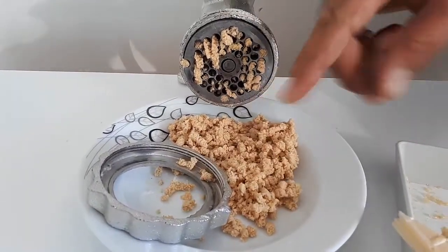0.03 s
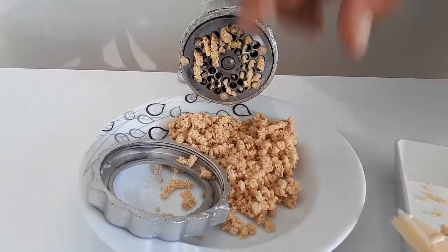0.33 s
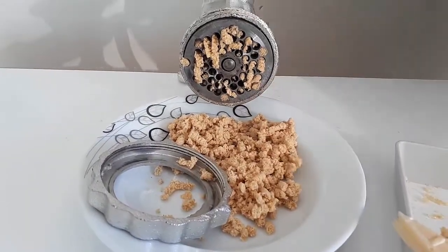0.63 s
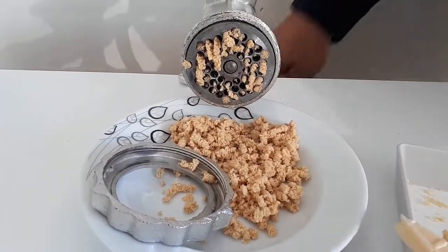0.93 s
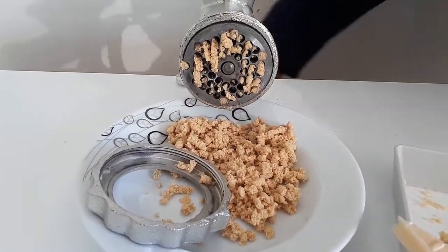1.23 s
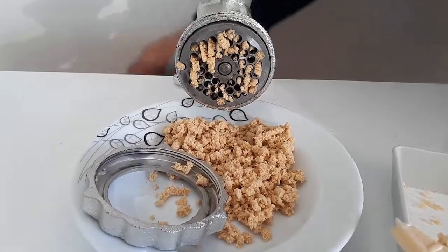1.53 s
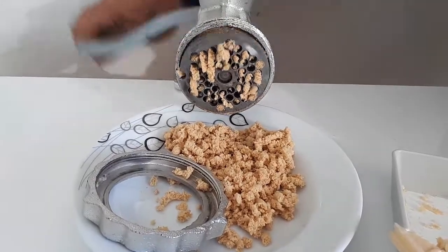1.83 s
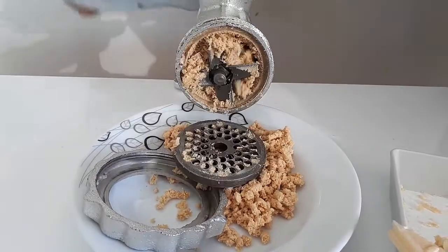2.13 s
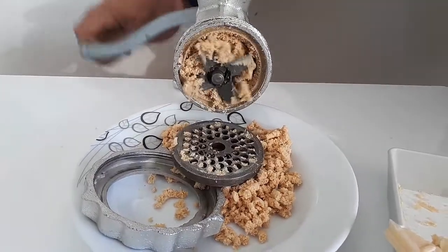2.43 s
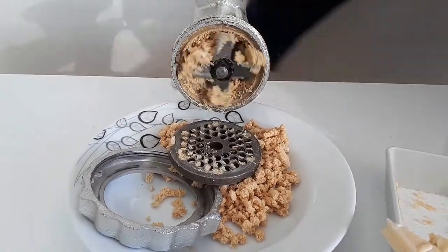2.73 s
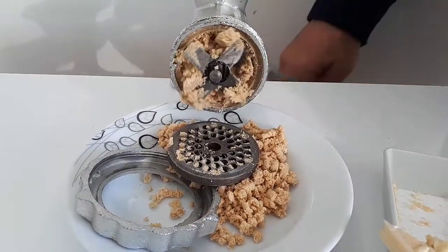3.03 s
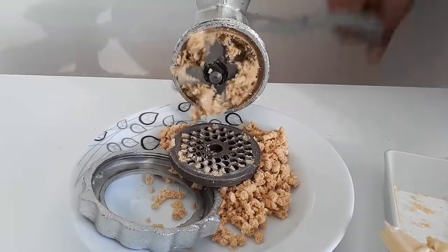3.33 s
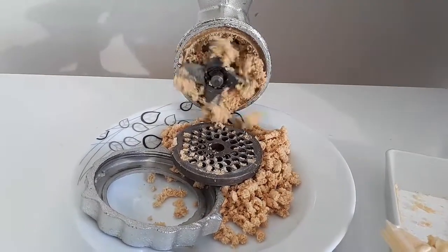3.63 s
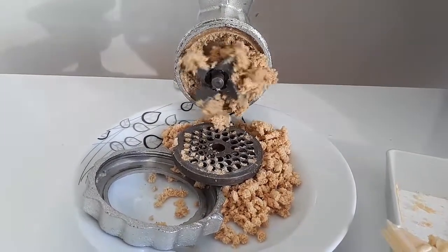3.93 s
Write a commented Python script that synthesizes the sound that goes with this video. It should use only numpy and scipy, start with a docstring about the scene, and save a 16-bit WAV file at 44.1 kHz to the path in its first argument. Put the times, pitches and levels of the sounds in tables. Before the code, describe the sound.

A hand-cranked metal grinder starts softly at about 1 second, after a faint room hum, grinding and knocking in uneven strokes over a dull table rumble. At about 2.1 seconds its steel disc lands on a plate with one loud, briefly ringing clank. The strokes continue with faint wet crackles and a small pop of dough near 2.9 seconds, then knock louder and faster from 3.4 to 4 seconds.

```python
"""First come two faint hisses over the low hum of a small room. Then a hand-cranked metal grinder
pushes crumbly dough onto a plate. Its auger (the screw inside) grinds in strokes and knocks in its
housing, the crank rubs and squeaks, the table rumbles, and the dough crackles wetly and pops.
About two seconds in, the perforated steel disc falls off and lands on the plate with one ringing
clank. The grinding goes on and grows louder."""
import sys
import numpy as np
from scipy import signal
from scipy.fft import rfft, irfft
from scipy.io import wavfile
from scipy.ndimage import uniform_filter1d

SR = 44100
rng = np.random.default_rng(int(sys.argv[2]) if len(sys.argv) > 2 else 0)


def master(y):
    """Save y as 16-bit WAV."""
    cut = np.clip(np.atleast_2d(y).T, -1, 1)
    pcm = np.round(cut * 32767)  # scale
    wavfile.write(sys.argv[1], SR, pcm.astype(np.int16))


N = 176400
T = np.arange(N) / SR
FFT_SIZE = 2 ** 18
HZ = np.maximum(np.arange(FFT_SIZE // 2 + 1) * SR / FFT_SIZE, 1)

# how long the room echoes (t60 is the time to fade by 60 dB): f/Hz, t60/s
ROOM_DECAY = [(100, 0.5), (400, 0.8122), (1000, 0.4933), (2500, 0.5651), (5000, 0.5), (8000, 0.5),
              (15000, 0.0053)]
# how alike left and right are: f/Hz, likeness (0 to 1)
STEREO_LIKENESS = [(60, 1), (150, 0.969), (380, 0.747), (950, 0), (2400, 0), (15000, 0)]
# tone colour of the room's hum: f/Hz, level/dB
HUM_COLOUR = [(25, -21), (50, -15), (85, -13), (125, -5.5), (155, 0), (190, -20), (260, -20.5),
              (500, -23.5), (1000, -24.5), (2000, -29.5), (5000, -33.5), (8000, -32.5), (12000, -34),
              (15500, -37.5)]
# brief, fine hisses: t/s, level/dB, half-length/s
HISS_EVENTS = [(0.195, -60.5, 0.0287), (0.273, -65.5, 0.0257), (2.509, -57.5, 0.051), (3.68, -50, 0.0177)]
# colour of the hisses: f/Hz, level/dB
HISS_COLOUR = [(3000, -10.5), (8000, -11.5), (11500, -5.5), (15000, -2.5)]

# loudness of the table's rumble: t/s, level/dB
RUMBLE_CURVE = [(0, -68), (1.02, -80), (1.065, -49), (1.25, -57.5), (1.65, -54.5), (1.87, -52.5),
                (1.94, -41), (2.01, -38), (2.08, -34.5), (2.25, -48.5), (2.44, -44), (2.52, -34),
                (2.7, -44.5), (3.02, -49), (3.14, -43.5), (3.28, -48.5), (3.42, -42), (3.5, -36.5),
                (3.69, -34.5), (3.79, -39), (4, -34)]
# colour of the rumble: f/Hz, level/dB
RUMBLE_COLOUR = [(25, -29.5), (40, -23), (55, -13.5), (68, -17.5), (85, -7), (115, 1), (165, 0),
                 (215, -4.5), (280, -13.5), (400, -22), (700, -29.5), (1500, -36.5), (4000, -52)]
# resonances of the table, the pitches it favours: f/Hz, width/Hz, lift/dB
TABLE_PEAKS = [(55.3, 12, 4.5), (86.5, 9.6, 7), (110, 12, 3), (145.2, 5.3, 3.5), (237.1, 16, 8),
               (347, 23, 3.5)]
# dull bumps of the crank and clamp: t/s, level/dB, f/Hz, t60/s
CRANK_BUMPS = [(1.696, -40.5, 127.2, 0.22), (1.925, -27.5, 224, 0.144), (1.974, -33, 616.4, 0.044),
               (2.055, -29, 85.13, 0.227), (2.496, -26.5, 231, 0.17), (2.89, -30, 201.1, 0.08),
               (2.949, -33, 163, 0.043), (3.108, -25.5, 212.2, 0.086), (3.667, -25.5, 108.1, 0.09),
               (3.833, -23, 492.6, 0.0475)]
# loudness of the crank's rubbing: t/s, level/dB
RUB_CURVE = [(1.1, -80), (1.68, -75), (1.71, -59), (1.78, -56.5), (1.84, -63.5), (1.9, -53.5),
             (1.925, -48.5), (1.98, -47.5), (2.04, -49.5), (2.4, -58), (2.84, -68.5), (2.865, -40.5),
             (2.91, -46.5), (2.98, -58), (3.09, -66.5), (3.115, -50), (3.16, -66.5), (3.42, -57.5)]
# colour of the rubbing: f/Hz, level/dB
RUB_COLOUR = [(120, -19), (250, 6.5), (400, -0.5), (600, -5), (750, -9), (1200, -22), (2600, -28),
              (6000, -47.5)]
# squeaks of metal on metal: t/s, level/dB, f/Hz, half-length/s
CRANK_SQUEAKS = [(1.87, -74, 7460, .022), (1.925, -59.5, 7490, 0.0142), (2.847, -79.5, 7900, 0.029),
                 (2.95, -78, 7777, 0.0237), (3.33, -76, 7600, .03), (3.68, -69, 7690, 0.016)]

# swells of wet crackle in the dough: t/s, level/dB, rise/s, fall/s
DOUGH_SWELLS = [(1.928, -66.5, 0.0045, 0.0214), (2.051, -53.5, 0.0059, 0.0047), (2.51, -67, 0.02, 0.023),
                (2.852, -64.5, 0.0024, 0.0086), (3.094, -58, 0.00081, 0.003), (3.129, -66.5, 0.0138, 0.05),
                (3.496, -57.5, 0.00378, 0.0054), (3.57, -64, 0.14, 0.058), (3.674, -40.5, 0.00286, 0.0043),
                (3.9, -87.5, .08, .1)]
# colour of the crackle: f/Hz, level/dB
CRACKLE_COLOUR = [(1500, -2), (3000, 3.5), (5000, -1), (7500, 0.5), (10000, -12.5), (13000, -5),
                  (16000, -5)]
# popping air pockets: t/s, level/dB, first f/Hz, last f/Hz, t60/s
AIR_POPS = [(2.851, -22.5, 244.3, 693, 0.03195), (3.107, -32, 300, 473, 0.0407)]

# strokes of the auger, one list each: t/s, grinding level/dB, scraping level/dB
AUGER_STROKES = [
    [(1.024, -76, -96), (1.044, -58, -68.5), (1.06, -51.5, -54.5), (1.08, -51.5, -61), (1.125, -73, -64.5),
     (1.18, -77.5, -72.5)],
    [(1.9, -66.5, -78.5), (1.93, -54.5, -56), (1.96, -67.5, -79), (1.98, -53.5, -59), (2.015, -79, -90.5),
     (2.053, -40, -50), (2.078, -52.5, -59)],
    [(2.3, -56.5, -84), (2.32, -49, -70.5), (2.35, -52.5, -81.5)],
    [(2.44, -58, -80), (2.478, -46, -72), (2.503, -35, -63), (2.565, -39, -57.5), (2.605, -50, -72.5),
     (2.68, -78, -71.5), (2.82, -56, -83.5)],
    [(3.22, -81, -95), (3.33, -81, -87), (3.425, -59, -84), (3.448, -32.5, -66), (3.52, -37, -58),
     (3.62, -41, -56.5), (3.69, -43.5, -53), (3.75, -46.5, -60.5), (3.808, -39.5, -59), (3.828, -36.5, -51),
     (3.89, -40.5, -48), (3.945, -44, -62), (4.0, -35.5, -55.5)],
]
# knocks of the auger in its housing: t/s, knock level/dB, bright click level/dB
AUGER_KNOCKS = [(1.043, -40, -71), (1.0553, -31.5, -57.5), (1.0609, -33, -63.5), (1.087, -43.5, -65),
                (1.926, -37, -57), (2.319, -39, -75), (2.4857, -28.5, -63.5), (2.506, -26.5, -53.5),
                (2.565, -27, -59), (2.781, -42, -74), (3.092, -50, -60), (3.443, -26.5, -60),
                (3.4531, -16, -43), (3.4945, -14.5, -42), (3.498, -20.5, -57.5), (3.563, -20.5, -46),
                (3.593, -27, -54), (3.606, -22, -46.5), (3.626, -26.5, -50), (3.6436, -12.5, -32.5),
                (3.6746, -20.5, -40.5), (3.69, -22, -49), (3.782, -32, -62.5), (3.82, -22, -36.5),
                (3.823, -22.5, -50), (3.835, -27, -39.5), (3.8855, -14.5, -30), (3.891, -19, -52),
                (3.912, -36, -51), (3.960, -19, -50), (3.963, -24, -55)]
# colour of the housing: f/Hz, level/dB
HOUSING_COLOUR = [(60, -18), (130, 1), (230, 3.5), (285, 3.5), (350, 6), (480, 4), (620, 0), (1000, -2),
                  (1450, -5), (1800, -12), (2250, -26), (2800, -23.5), (4000, -44.5), (8000, -43),
                  (15000, -51)]
# resonances of the housing: f/Hz, width/Hz, lift/dB
HOUSING_PEAKS = [(336.4, 52, 4.5), (479, 45, 3.5), (748.4, 57, 8.5), (860.9, 29, 8), (913, 22, 5.5),
                 (1120, 65, 10), (1315, 55, 10), (1440.5, 45, 7), (1732.3, 22, 4), (1996.5, 50, 13),
                 (2596, 81, 12.5), (2817.5, 46, 7.5), (4885, 350, 16.5)]
# extra colour of the first stroke, with the disc still in place: f/Hz, lift/dB
DISC_ON_COLOUR = [(60, -4.5), (200, -1), (350, 4.5), (450, -11), (650, -3.5), (850, -1.5), (1100, -4),
                  (1700, 6.5), (2600, 7), (5000, 3)]
# colour of the bright scraping: f/Hz, level/dB
SCRAPE_COLOUR = [(700, -22.5), (1800, 7), (2700, 4.5), (3800, -4), (6000, -15), (7500, -16.5),
                 (10000, -19.5), (15000, -28)]

# contacts of the landing disc: t/s, level/dB
DISC_CONTACTS = [(2.0815, -1), (2.0842, -11), (2.096, -17.5)]
# ringing tones of the disc, in close groups that beat: f/Hz, level/dB, t60/s, left minus right/dB
DISC_TONES = [(2286, -11, 0.059, -5.5), (2293, -28, .44, -2), (2253, -28, 0.28, 5), (2312, -39, .45, 0),
              (2132, -41, .4, 0), (2440, -40, .28, 0), (3550, -11.5, .06, 1.5), (3538, -28, 0.28, 0),
              (3601, -40, .33, -4), (3564, -40, .4, 0), (3500, -35, .22, 0), (4963, -25, 0.11, -7.5),
              (4985, -42, .12, 0), (4957, -48, .58, -2), (6422, -39, 0.26, -6), (4967.6, -48.5, .58, -2),
              (7530, -38, .1, -5), (8200, -45, .12, 4.5), (7965, -42, .1, 9), (8865, -46, 0.11, -9.5),
              (9400, -49, .09, -8), (10260, -48, 0.13, -7), (11340, -47, .13, -1), (12600, -51, 0.12, -6.5),
              (13320, -50, 0.1, 3)]
# ringing tones of the loaded plate: f/Hz, level/dB, t60/s, left minus right/dB
PLATE_TONES = [(455.7, -29.5, 0.326, 0.5), (910.5, -36.5, 0.29, -1.5), (1062.3, -43, 0.59, -1),
               (1088.3, -35.5, 0.13, -5), (1274, -29.5, 0.08, -5.5), (1593.4, -34.5, .1, -13)]
# colour of the sharp crack as the disc hits the plate: f/Hz, level/dB
CRACK_COLOUR = [(100, -17), (450, -6.5), (700, 4), (1050, 6), (1600, 1), (2800, -4.5), (3800, -5),
                (5000, -16), (5800, -14.5), (8000, -17), (10000, -20), (13000, -15.5), (16000, -30.5)]


def from_db(db):
    """Turn decibels into a number to multiply by."""
    return 10 ** (np.asarray(db) / 20)


def unit_rms(x):
    """Scale a signal so that its average strength (rms) is 1."""
    return x / np.sqrt(np.mean(x ** 2) + 1e-20)


def unit_energy(x):
    """Scale a signal so that its squares add up to 1."""
    return x / np.linalg.norm(x)


def at_hz(points, hz=HZ):
    """Read between the rows of a table, with octaves evenly spaced."""
    freqs, values = np.transpose(points)
    return np.interp(np.log(hz), np.log(freqs), values)


def lifts(resonances):
    """The boost in dB that resonances give at each frequency."""
    return sum(db / (1 + (2 * (HZ - hz) / width) ** 2) for hz, width, db in resonances)


def level(rows, column=1):
    """Gain along a loudness curve, silent outside it."""
    rows = np.array(rows)
    return from_db(np.interp(T, rows[:, 0], rows[:, column], left=-200, right=-200))


def response(db):
    """How an object with this colour answers one click, scaled to a peak of 1."""
    cepstrum = irfft(np.log(from_db(db)))
    # folding onto the first half makes the sound come after the click, never before
    cepstrum[1:FFT_SIZE // 2] *= 2
    cepstrum[FFT_SIZE // 2 + 1:] = 0
    answer = irfft(np.exp(rfft(cepstrum)))[:SR // 2]
    return answer / np.abs(answer).max()


def through(x, answer):
    """Pass a sound through an object, given its answer to one click."""
    return signal.fftconvolve(np.atleast_2d(x), np.atleast_2d(answer), axes=-1)[:, :N]


def keep_band(x, side, hz, order):
    """Keep the "low" or "high" side of a frequency; a higher order cuts more steeply."""
    return signal.sosfilt(signal.butter(order, hz, side, fs=SR, output="sos"), x)


def pan(db):
    """Left and right gains, the left one louder by db."""
    return from_db(np.array([[db], [-db]]) / 2)


def clicks(rows):
    """One click for each pair of time and level."""
    out = np.zeros(N)
    for start, db in rows:
        out[int(start * SR)] += from_db(db)
    return out


def grains(per_s, spread_db):
    """Random clicks of uneven size."""
    sizes = from_db(spread_db * np.minimum(rng.exponential(1, N), 4)) * rng.choice([-1, 1], N)
    return sizes * (rng.random(N) < per_s / SR)


def wobble(samples, shape=N):
    """A random wander: noise averaged over this many samples."""
    return unit_rms(uniform_filter1d(rng.standard_normal(shape), size=samples))


def stereo_noise(db):
    """Noise with this colour, alike in both ears only in the bass."""
    mid, side = rfft(rng.standard_normal((2, FFT_SIZE)))
    alike = np.clip(at_hz(STEREO_LIKENESS), -.99, .99)
    spectrum = np.sqrt(1 + alike) * mid + np.sqrt(1 - alike) * side * [[1], [-1]]
    return unit_rms(irfft(from_db(db) * spectrum)[:, :N])


def room_echo():
    """The walls answer a click with a wash of echoes that dies fastest in the high treble."""
    t, build_s = T[:SR], 0.0022
    octaves = np.log2(np.maximum(np.arange(SR // 2 + 1), 1))
    noise = rfft(stereo_noise(0 * HZ)[:, :SR])
    echo = 0
    for octave in range(5, 15):
        band = irfft(noise * np.maximum(1 - abs(octaves - octave), 0))
        echo = echo + band * from_db(-60 * t / at_hz(ROOM_DECAY, 2 ** octave))
    return unit_rms(echo * (1 - np.exp(-t / build_s))) / np.sqrt(SR)


def in_room(x, echo, echo_db):
    """A sound plus its echo."""
    return x + from_db(echo_db) * through(x, echo)


def room_hum():
    """Quiet, steady noise, strongest in the bass."""
    return from_db(-68) * stereo_noise(at_hz(HUM_COLOUR))


def hisses():
    """Brief, faint hisses high in the treble."""
    swell = sum(from_db(db) * np.exp(-((T - peak) / width) ** 2) for peak, db, width in HISS_EVENTS)
    return swell * stereo_noise(at_hz(HISS_COLOUR))


def table(echo):
    """The table rumbles under the crank and takes short, dull bumps."""
    bumps, attack_s = 0, 0.0011
    for start, db, hz, t60 in CRANK_BUMPS:
        t = np.maximum(T - start, 0)
        loudness = from_db(db - 60 * t / t60) * (1 - np.exp(-t / attack_s))
        bumps = bumps + loudness * np.sin(2 * np.pi * hz * t)
    rumble = level(RUMBLE_CURVE) * stereo_noise(at_hz(RUMBLE_COLOUR) + lifts(TABLE_PEAKS))
    return rumble + in_room(bumps, echo, echo_db=-9.5)


def crank(echo):
    """The crank rubs dully; now and then metal on metal gives a thin, wavering squeak."""
    waver_hz = 203 * wobble(samples=200)
    squeaks = 0
    for peak, db, hz, width in CRANK_SQUEAKS:
        loudness = from_db(db) * np.exp(-((T - peak) / width) ** 2)
        squeaks = squeaks + loudness * np.sin(2 * np.pi * np.cumsum(hz + waver_hz) / SR)
    rubbing = level(RUB_CURVE) * stereo_noise(at_hz(RUB_COLOUR))
    return rubbing + in_room(squeaks, echo, echo_db=-3.5)


def dough(echo):
    """Squeezed dough gives swells of tiny wet crackles."""
    swell = sum(from_db(db) * np.exp(-np.maximum((peak - T) / rise, (T - peak) / fall))
                for peak, db, rise, fall in DOUGH_SWELLS)
    crackle = through(grains(per_s=6000, spread_db=3.5), response(at_hz(CRACKLE_COLOUR)))
    return in_room(swell * unit_rms(crackle), echo, echo_db=-5)


def air_pockets(echo):
    """Each air pocket in the dough rings briefly, its pitch rising as it opens."""
    glide_s, attack_s = 0.003674, 0.001636
    pops = 0
    for start, db, first_hz, last_hz, t60 in AIR_POPS:
        t = np.maximum(T - start, 0)
        hz = last_hz + (first_hz - last_hz) * np.exp(-t / glide_s)
        loudness = from_db(db - 60 * t / t60) * (1 - np.exp(-t / attack_s))
        pops = pops + loudness * np.sin(2 * np.pi * np.cumsum(hz * (t > 0)) / SR)
    return in_room(pops, echo, echo_db=-8)


def chatter(rows):
    """The loose auger follows each knock with a quick flurry of dull, random rebounds."""
    contacts, t60 = clicks(rows), 0.0226
    fade = unit_energy(from_db(-60 * T[:SR // 4] / t60))
    noise = rng.standard_normal((2, N)) / 2 + rng.standard_normal(N)
    rebounds = keep_band(noise * through(contacts, fade), "low", hz=2794, order=2)
    return contacts + from_db(1.5) * rebounds


def auger(echo):
    """Many tiny slips and single knocks make the housing ring; scraping adds the treble."""
    colour = at_hz(HOUSING_COLOUR) + lifts(HOUSING_PEAKS)
    housing, with_disc = response(colour), response(colour + at_hz(DISC_ON_COLOUR))
    scrape = response(at_hz(SCRAPE_COLOUR))
    flutter = from_db(3 * wobble(samples=500))
    slips = unit_rms(grains(per_s=1000, spread_db=2) * flutter) / np.linalg.norm(housing)
    slips *= sum(level(stroke, column=1) for stroke in AUGER_STROKES)
    scraping = unit_rms(grains(per_s=6000, spread_db=2) * flutter)
    scraping *= sum(level(stroke, column=2) for stroke in AUGER_STROKES)
    blows = chatter([(start, db) for start, db, _ in AUGER_KNOCKS])
    blows = keep_band(blows, "high", hz=606, order=1)
    bright_clicks = chatter([(start, db) for start, _, db in AUGER_KNOCKS])
    first = T < AUGER_STROKES[1][0][0]  # true until the second stroke begins
    grinding = through(slips * first, with_disc) + through(slips * ~first, housing)
    grinding += through(scraping, unit_energy(scrape))
    knocks = through(blows * first, with_disc) + through(blows * ~first, housing)
    knocks += through(bright_clicks, scrape)
    return pan(-1.5) * (in_room(grinding, echo, echo_db=-2) + in_room(knocks, echo, echo_db=-7))


def falling_disc(echo):
    """Disc and plate ring, damped quickly by the crumbs; each contact gives a short crack."""
    right_lag_s, attack_s, crack_t60 = 0.0002202, 0.00061, 0.058
    t = np.maximum(T[:SR] - np.array([[0], [right_lag_s]]), 0)  # reaches the right side later
    tones = DISC_TONES + PLATE_TONES
    # the tones waver as the disc settles in the crumbs
    waver_db = uniform_filter1d(2.5 * wobble(samples=1100, shape=(len(tones), SR)), size=300)
    ring = 0
    for k, (hz, db, t60, side_db) in enumerate(tones):
        waver_onset = np.minimum(t / t60 * 10, 1)
        loudness = from_db(db - 60 * t / t60 + waver_db[k] * waver_onset)
        ring = ring + pan(side_db) * loudness * np.sin(2 * np.pi * hz * t) * (-1) ** k
    clank = through(clicks(DISC_CONTACTS[:1]), ring * (1 - np.exp(-t / attack_s)))
    burst = rng.standard_normal((2, SR)) * from_db(-20.5 - 60 * t / crack_t60)
    plate = unit_energy(response(at_hz(CRACK_COLOUR)))
    crack = pan(1.5) * through(through(clicks(DISC_CONTACTS), burst), plate)
    return in_room(clank, echo, echo_db=-17.5) + in_room(crack, echo, echo_db=-7.5)


def scene():
    """All the sources in one room, over its quiet hum."""
    echo = room_echo()
    grinder = auger(echo) + crank(echo) + table(echo) + falling_disc(echo)
    return grinder + dough(echo) + air_pockets(echo) + hisses() + room_hum()


def record(dry):
    """Soften the deepest bass and cut the highest treble steeply."""
    thinned = keep_band(dry, "high", hz=42, order=3)
    top_hz = 15600
    return signal.sosfilt(signal.ellip(10, .2, 70, top_hz, fs=SR, output="sos"), thinned)


dry = scene()
out = record(dry)
master(out)
```